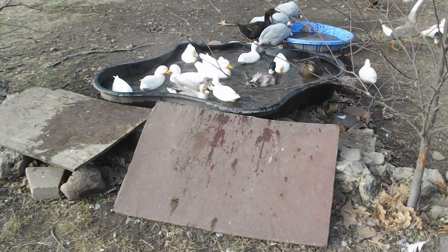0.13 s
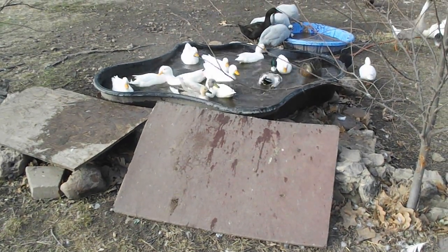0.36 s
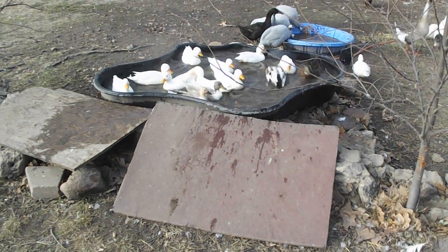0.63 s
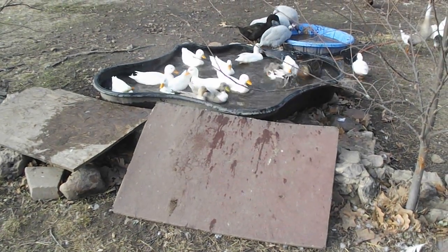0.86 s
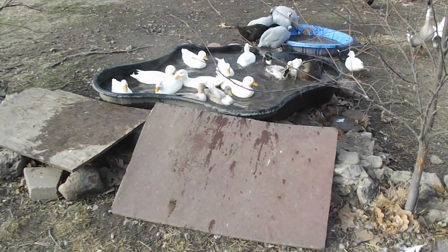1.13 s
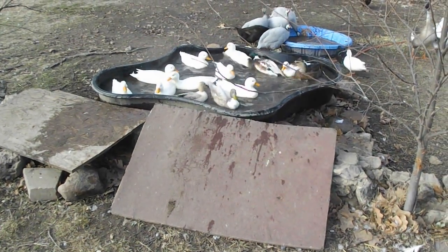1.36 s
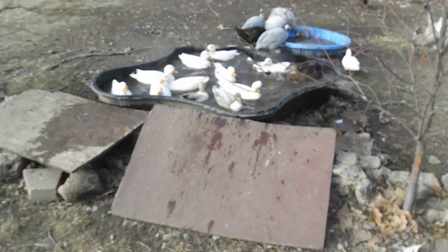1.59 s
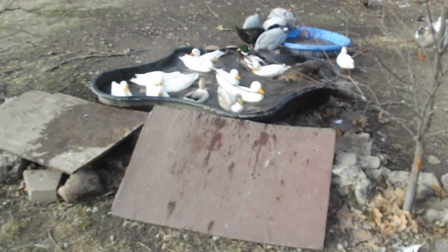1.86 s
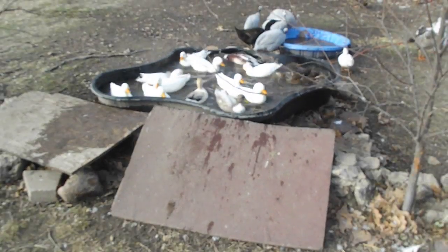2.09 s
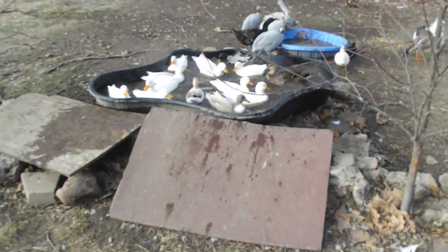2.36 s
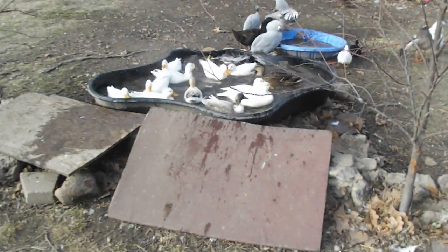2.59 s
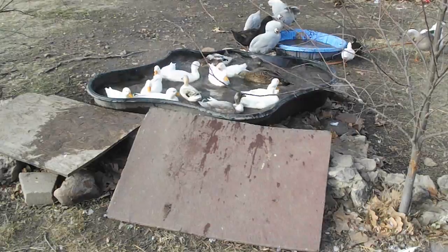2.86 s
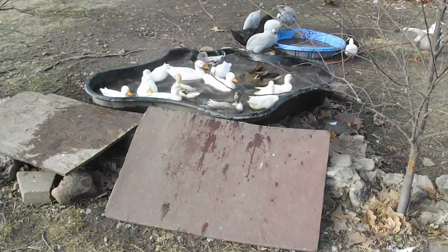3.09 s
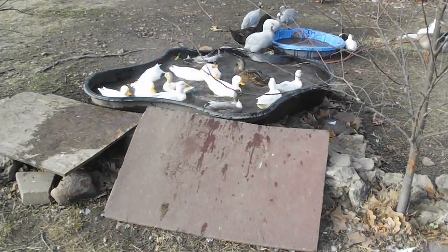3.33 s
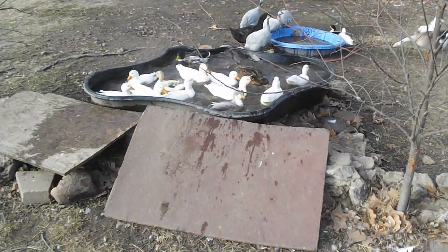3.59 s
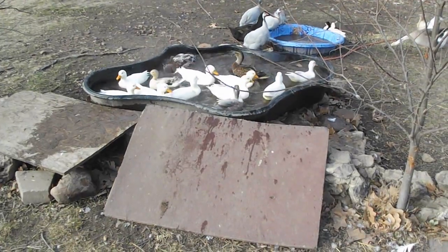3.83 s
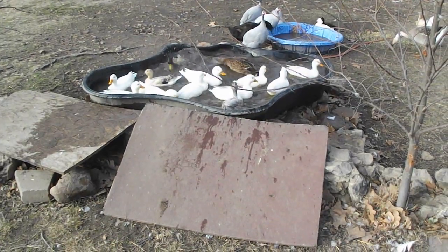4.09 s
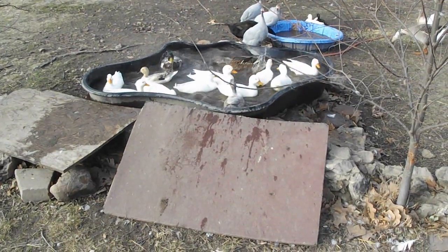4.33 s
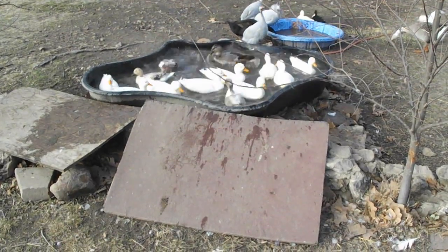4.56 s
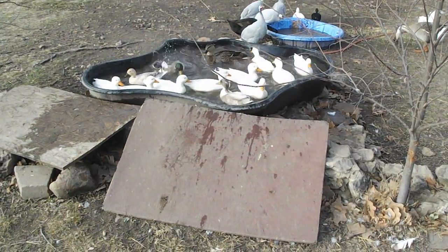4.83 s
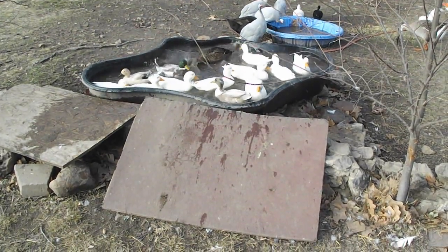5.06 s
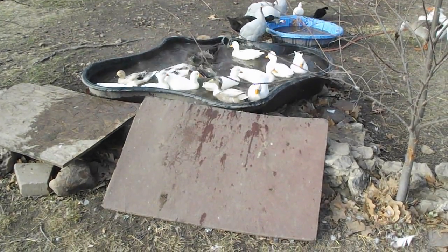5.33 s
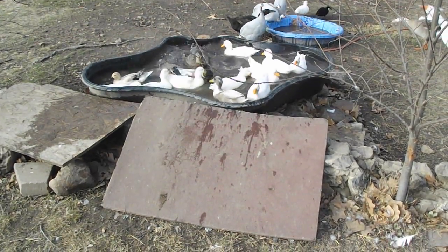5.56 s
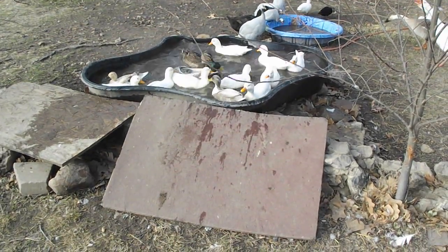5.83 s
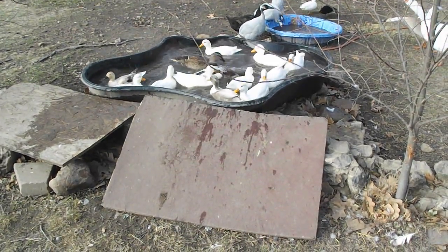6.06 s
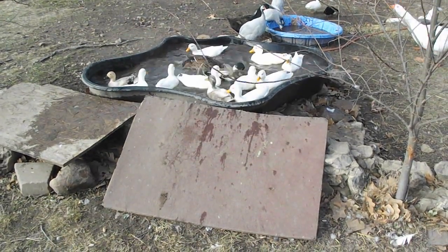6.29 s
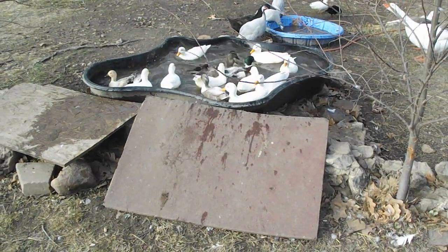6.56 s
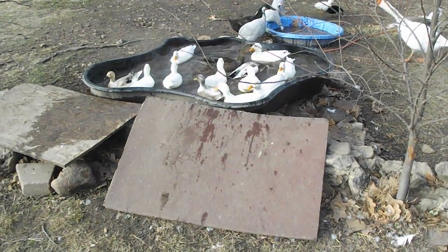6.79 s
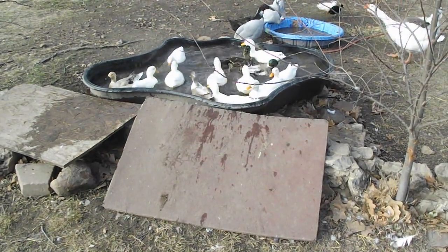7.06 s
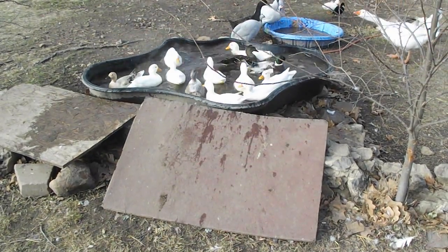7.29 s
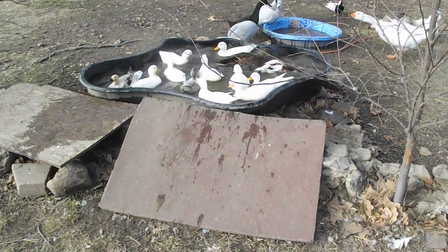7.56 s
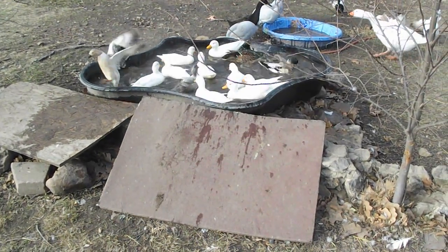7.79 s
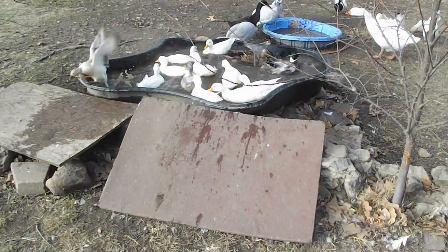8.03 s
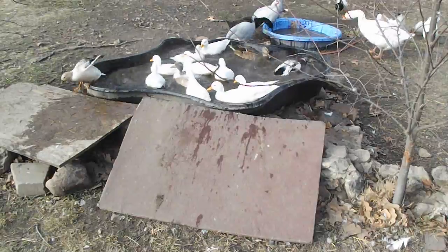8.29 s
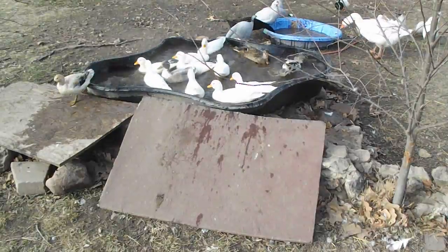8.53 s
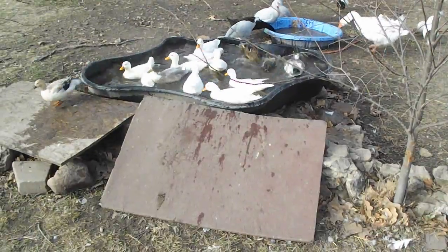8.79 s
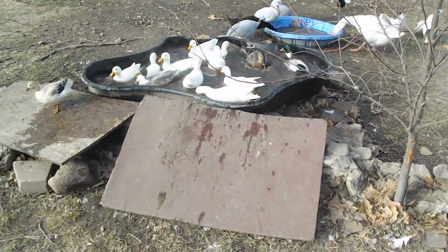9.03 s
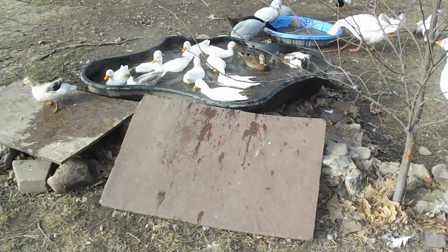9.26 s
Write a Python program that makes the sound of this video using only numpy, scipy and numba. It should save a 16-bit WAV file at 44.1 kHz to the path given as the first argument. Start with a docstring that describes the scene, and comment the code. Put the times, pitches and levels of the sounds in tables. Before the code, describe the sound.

A crowd of small ducks quacks, chuckles and croaks over each other at a backyard pond, with wind rumbling and buffeting the microphone near the end.

```python
"""A backyard pond crowded with small ducks: long quacks, throbbing chuckles, low rasps, far mutters, honks,
croaks and squeaks overlap. Pulses and breath noise ring throat resonances to make the voices; squeaks are whistles.
The hush of the yard is filtered noise with chirped drips; splashes are decaying noise bursts.
Wind buffets the small microphone as rumble, roar and damped swings; a stepped gain control cuts loud peaks."""
import sys
import numpy as np
from scipy import signal
from scipy.fft import rfft, irfft, next_fast_len
from scipy.io import wavfile
from scipy.ndimage import uniform_filter1d
from numba import njit

SR = 44100
rng = np.random.default_rng(int(sys.argv[2]) if len(sys.argv) > 2 else 0)


def wav_out(sig):
    """Save sig, one row per channel (or a flat mono array), as 16-bit PCM at SR to the path in sys.argv[1]."""
    wavfile.write(sys.argv[1], SR, np.round(np.clip(np.atleast_2d(sig).T, -1, 1) * 32767).astype(np.int16))


def how_loud(loudness_db):
    """Turn decibels into a plain amplitude multiplier (0 dB gives 1, 20 dB gives 10)."""
    steps = np.asarray(loudness_db, float) / 20
    return 10 ** steps


N = 414540


def evened(x):
    """Normalization: scales a signal to rms 1."""
    return x / np.sqrt(np.mean(x ** 2) + 1e-20)


def read(points, hz):
    """Spectral interpolation: reads a spectrum table on a log-frequency axis."""
    f, value = np.transpose(points)
    return np.interp(np.log(hz + 1), np.log(f + 1), value)


def add(mix, s, sound):
    """Superposition: adds a sound to the mix at time s."""
    part = mix[max(round(s * SR), 0):][:len(sound)]
    part += sound[:len(part)]


def coloured(x, points):
    """Linear filtering: multiplies the spectrum of x by a table of gains."""
    size = next_fast_len(len(x))
    gain = how_loud(read(points, np.fft.rfftfreq(size, 1 / SR)))
    return irfft(rfft(x, size) * gain, size)[:len(x)]


def resonate(x, hz, width):
    """Heterodyne resonance: shifts the curve hz down to zero, smooths twice and shifts back, with gain 1."""
    turn = np.exp(2j * np.pi * np.cumsum(hz * np.ones(len(x))) / SR)
    r = np.exp(-np.pi * width / SR)
    return 2 * (turn * signal.lfilter([(1 - r) ** 2], np.poly([r, r]), x / turn)).real


def wander(size, seconds):
    """Random modulation: twice-smoothed noise of rms 1 that drifts over the given seconds."""
    span = int(seconds * SR)
    return evened(uniform_filter1d(uniform_filter1d(rng.standard_normal(size), span), span))


# relative spectrum of the yard's hush: (frequency [Hz], level [dB])
YARD_COLOUR = [(100, 4.5), (300, -5.5), (700, -6.5), (1500, -10.5), (3000, -4.5), (8000, -8), (16000, -9.5)]


def yard():
    """Random noise in drifting time-frequency patches: a watery hush, with drips as rising damped chirps."""
    hz = np.fft.rfftfreq(512, 1 / SR)
    real, imaginary, patches = rng.standard_normal((N // 128 + 5, 257, 3)).T
    patches = evened(uniform_filter1d(uniform_filter1d(patches, 6, 0), 14, 1))
    spectrum = (real + 1j * imaginary) * how_loud(read(YARD_COLOUR, hz)[:, None] + 1.3 * patches)
    hush = evened(signal.istft(spectrum, nperseg=512, noverlap=384)[1][:N])
    # about 120 drips per second, most of them faint
    drops = (rng.random(N) < 120 / SR) * how_loud(3.5 * np.minimum(rng.exponential(1, N), 4))
    kind, u, drips = rng.integers(0, 12, N), np.arange(600) / SR, np.zeros(N)
    for k, f in enumerate(np.geomspace(900, 3600, 12)):
        chirp = np.sin(2 * np.pi * f * u * (1 + 8 * u))
        drip = chirp * np.exp(-u * f / 4) * np.minimum(u / 0.00022, 1)
        drips += signal.oaconvolve(drops * (kind == k), drip)[:N]
    return how_loud(-32.5) * (hush + how_loud(-19.0) * evened(drips))


# level of the wind's rumble at the microphone: (time [s], level [dB])
WIND_LEVEL = [(0.0, -23), (1.69, -31.5), (2.129, -20.5), (2.34, -39.5), (2.712, -24.5), (3.982, -42),
              (4.07, -30), (5.48, -41.5), (6.059, -24), (6.12, -43), (6.59, -25), (6.76, -45),
              (6.92, -30.5), (7.17, -22.5), (7.25, -12.5), (7.364, -5), (7.451, -6.5), (7.66, -13),
              (7.72, -13.5), (8.07, -17.5), (8.191, -34), (8.24, -8), (8.33, -15.5), (8.411, -11.5),
              (8.5, -22), (8.83, -32.5), (8.892, -13.5), (8.961, -28), (9.19, -21.5), (9.38, -10.5)]
# single buffets: (time of the crest [s], level of the swing [dB], frequency of the swing [Hz])
BUFFETS = [(7.28, -5, 104), (7.296, -4, 137), (7.34, -2, 221), (7.349, 7, 263), (7.365, 22, 251),
           (7.373, -6, 302), (7.38, 5, 203), (7.496, 5, 238), (7.422, 13.5, 120.6), (7.549, 6.5, 129),
           (7.752, -4.5, 135), (7.813, -1, 153), (8.049, -5, 218), (8.236, -2, 134), (8.279, 0.5, 150),
           (8.349, -8.5, 200), (8.382, -5, 114), (8.416, -6.5, 192), (8.47, -2.5, 198), (8.897, -15, 78.4),
           (9.062, -22, 78.5), (9.232, -5, 86.5), (9.259, -4, 113), (9.316, -2.5, 135), (9.349, 2.5, 113),
           (9.376, 2.5, 81)]
# relative spectrum of the rumble: (frequency [Hz], level [dB])
RUMBLE_COLOUR = [(15, -3), (40, 1.5), (100, -7), (170, -13), (300, -23), (500, -48)]
# relative spectrum of the roar: (frequency [Hz], level [dB])
ROAR_COLOUR = [(60, -17), (150, -1), (300, -5), (600, -14), (1200, -29), (2500, -40)]


def buffet(hz, t):
    """Damped oscillation: a few swings of the membrane, a sharp tip, and a puff of roar stirred up around it."""
    swing = np.cos(2 * np.pi * hz * t) * np.exp(np.minimum(t * hz / .5, -t * hz / .9))
    snap = how_loud(-11) * np.exp(-(t / 0.00033) ** 2)
    puff = evened(coloured(rng.standard_normal(len(t)), ROAR_COLOUR))
    # the puff decays by 60 dB in 57 ms and builds up four times as fast
    return swing + snap + how_loud(-8.5 - 60 * np.maximum(t, -4 * t) / 0.057) * puff


def wind():
    """Turbulent pressure on the membrane: lumpy rumble, a roar that grows faster than it, and single buffets."""
    level_db = np.interp(np.arange(N) / SR, *np.transpose(WIND_LEVEL))
    rumble = evened(coloured(rng.standard_normal(N), RUMBLE_COLOUR) * how_loud(2.8 * wander(N, 0.015)))
    roar = evened(coloured(rng.standard_normal(N), ROAR_COLOUR) * how_loud(4.5 * wander(N, .01)))
    out = how_loud(level_db) * (rumble + how_loud(1.83 * (level_db + 8.5)) * roar)
    t = np.arange(-600, 2400) / SR
    for s, swing_db, hz in BUFFETS:
        add(out, s + t[0], how_loud(swing_db) * buffet(hz, t))
    return out


# splashes: (time [s], level that scales the burst [dB])
SPLASHES = [(3.986, -32), (7.8034, -16), (7.8517, -1), (8.002, -11.5), (8.025, -5), (8.038, -18),
            (8.599, -20.5), (8.7025, -16.5), (8.7548, -16.5)]


def splashes():
    """Impact noise with exponential decay: wings and feet slap the water in short bright bursts."""
    out, t = np.zeros(N), np.arange(3000) / SR
    for s, level_db in SPLASHES:
        hiss = np.diff(rng.standard_normal(len(t) + 1))
        burst = resonate(rng.standard_normal(len(t)), 2800, 1000) + 0.5 * hiss
        # 60 dB of decay in 65 ms
        add(out, s, how_loud(level_db - 60 * t / 0.065) * np.minimum(t / 0.00039, 1) * burst)
    return out


def voice(hz, rough, bright_db, throat, stretch, middle_db=None, opening=None):
    """Source-filter principle: syrinx pulses and puffs of breath ring the throat in low, middle and upper bands."""
    turns = np.cumsum(hz * (1 + 0.022 * rough * wander(len(hz), 0.0034))) / SR
    k = np.arange(1, 70)[:, None]
    # the pulses are slightly smeared in time: upper harmonics lag the lower ones
    pulses = (np.cos(2 * np.pi * k * turns - .04 * k ** 2) * (k * hz < 11000)).sum(0)
    puffs = (4.5 + np.exp(-(turns % 1) / .5)) * rng.standard_normal(len(hz))
    drive = np.sqrt(1 - rough) * evened(pulses) + np.sqrt(rough) * evened(puffs)

    def ring(f, width, db):
        """Resonance with flutter: each one swells and fades a little on its own."""
        factor = stretch if f < 2300 or opening is None else opening if f < 3500 else 1
        return how_loud(db + 1.6 * wander(len(hz), .018)) * resonate(drive, f * factor, width)

    rings = [(row[0], ring(*row)) for row in throat]
    bands = (0, 1250), (1250, 2300), (2300, 9000)  # Hz, by the resting resonance
    low, middle, high = (sum(x for f, x in rings if a <= f < b) for a, b in bands)
    if middle_db is not None:
        remainder = np.sqrt(1 - np.clip(how_loud(bright_db), 0, .97) ** 2)
        part = np.clip(how_loud(middle_db) / remainder, 0, .95)
        low, middle = np.sqrt(1 - part ** 2) * evened(low), part * evened(middle)
    share = np.clip(how_loud(bright_db), .05, .97)
    edge = how_loud(-14) * evened(resonate(drive, 8000, 4100))  # the sharp edge of each pulse
    return np.sqrt(1 - share ** 2) * evened(low - middle) + share * (evened(high) + edge), turns


def call(s, t, effort_db, hz, bright_db, throat, clear, follow=0, chest_db=-22, middle_db=None, opening=1,
         hoarse_s=0.056):
    """Phonation onset: a call starts hoarse, clears, and turns hoarse again wherever the effort sags."""
    rough = clear + .6 * np.exp(-(t / hoarse_s) ** 2) + (effort_db.max() - effort_db) / 80
    stretch = (hz / 163) ** follow  # lower resonances follow the pitch
    sound, turns = voice(hz, np.clip(rough, 0, 1), bright_db, throat, stretch, middle_db, opening)
    sound = sound + how_loud(chest_db) * np.sin(2 * np.pi * turns)  # the chest radiates a weak fundamental
    return s, how_loud(effort_db) * sound * signal.windows.tukey(len(t), min(0.005 * SR / len(t), 1))


def rasp(s, level_db, length, hz, throat, rough, bright_db=-9):
    """Pulse-train excitation: a short run of slow pulses that sags in rate as it ends."""
    u = np.linspace(0, 1, int(length * SR))
    # every resonance is lowered by 7 %
    sound = voice(hz * (1 - 0.0948 * u ** 2), rough + 0 * u, bright_db, throat, 0.93)[0]
    return s, how_loud(level_db - 0.39 * u) * sound * signal.windows.tukey(len(u), .4)


# resting resonances of throat and open bill, for mutters and quacks: (frequency [Hz], width [Hz], level [dB])
OPEN_THROAT = [(691, 270, -10), (948, 232, 4), (1560, 140, 2.5), (2050, 510, 2), (2950, 224, -2.5),
               (3667, 225, -5), (4140, 810, -17.5)]


def mutters(mix):
    """Random arrivals: soft short rasps of birds further off, about five a second."""
    for at, size, hz, length in rng.random((5 * N // SR, 4)):
        seconds = np.interp(length, (0, 1), (.03, .08))
        pulse_hz = np.interp(hz, (0, 1), (110, 190))
        add(mix, *rasp(at * N / SR, -39 + 6 * size, seconds, pulse_hz, OPEN_THROAT, .4, -12))


# low nasal rasps, mostly drakes: (time [s], starting level [dB], length [s], starting pulse rate [Hz])
DRAKES = [(0.875, -32.5, 0.06, 89.8), (2.091, -26, 0.059, 118), (3.144, -30.5, 0.089, 123.6),
          (3.849, -25, 0.058, 141.3), (3.997, -29.5, 0.087, 116.8), (4.526, -23, 0.056, 117.7),
          (4.693, -26, 0.0856, 117.1), (4.892, -31.5, 0.048, 125), (5.06, -28.5, 0.087, 115.4),
          (5.566, -31.5, 0.097, 117.2), (6.19, -28.5, .1, 117.7), (6.888, -26, 0.088, 120.6),
          (7.082, -30, 0.051, 119), (4.237, -21.5, .08, 180.5), (0.553, -37, 0.071, 111)]
# resonances before the rasp lowers them: (frequency [Hz], width [Hz], level [dB])
DRAKE_THROAT = [(772, 200, 10), (1476, 480, 4), (2166, 57, 4), (2960, 1200, -9)]


def drakes(mix):
    """Nasal resonance: slow pulses ring strong low formants."""
    for row in DRAKES:
        add(mix, *rasp(*row, DRAKE_THROAT, .3))


# hoarse squawks: (time [s], starting level [dB], length [s], starting pulse rate [Hz])
SQUAWKS = [(8.15, -24, 0.056, 340), (8.995, -25, 0.0994, 210), (7.99, -34, 0.047, 49)]
# resonances before the rasp lowers them: (frequency [Hz], width [Hz], level [dB])
SQUAWK_THROAT = [(1120, 970, -12), (1670, 210, 17.5), (2050, 300, 15), (3200, 1100, -3)]


def squawks(mix):
    """Mixed excitation: more breath than pulses rings strong middle formants."""
    for row in SQUAWKS:
        add(mix, *rasp(*row, SQUAWK_THROAT, .6))


# harsh bright croaks: (time [s], starting level [dB], length [s], starting pulse rate [Hz])
CROAKS = [(0.142, -14.5, 0.03, 149.4), (0.999, -26.5, 0.065, 109.8), (2.262, -20, 0.062, 248.7),
          (2.388, -6.5, 0.029, 205), (2.868, -14, 0.038, 138.2), (2.981, -11.5, 0.027, 170.9),
          (4.292, -19, 0.047, 168), (5.83, -15.5, 0.059, 196.6), (5.99, -19, 0.085, 206),
          (6.066, -11, 0.043, 203.5), (6.407, -15.5, 0.022, 171.3), (6.636, -22.5, 0.032, 164)]
# resonances before the rasp lowers them: (frequency [Hz], width [Hz], level [dB])
CROAK_THROAT = [(970, 240, 3), (2063, 1400, -3), (2810, 480, 0), (3460, 1160, 1.5)]


def croaks(mix):
    """Mixed excitation: breathy pulses put most of their power into the upper formants."""
    for row in CROAKS:
        add(mix, *rasp(*row, CROAK_THROAT, .65, bright_db=-1.5))


# thin squeaks: (time [s], length [s], level [dB], starting frequency [Hz], final frequency [Hz])
SQUEAKS = [(0.217, 0.052, -35, 1258, 1416), (0.498, 0.051, -35, 1340, 1440),
           (0.524, 0.039, -33.5, 1695, 1854), (0.78, 0.027, -37.5, 1800, 1380),
           (1.408, .05, -26.5, 2020, 1385), (4.672, 0.095, -19.5, 1300, 1412),
           (4.743, .045, -26.5, 1840, 1954), (4.781, 0.029, -25.5, 1580, 1790),
           (6.665, 0.049, -26, 1860, 1270), (6.693, 0.026, -26.5, 1745, 1900),
           (7.671, 0.055, -35.5, 1950, 1600), (8.028, 0.028, -35, 1313, 1330),
           (8.125, 0.04, -24.5, 1356, 1400), (8.385, 0.031, -32, 1204, 1110),
           (8.424, 0.026, -31.5, 816, 880), (8.84, 0.034, -27.5, 1380, 1260),
           (8.949, 0.071, -24, 1314, 1490), (9.047, 0.029, -25, 2050, 1676),
           (9.221, 0.037, -33, 3335, 3650), (9.24, 0.038, -32.5, 3490, 2750)]


def squeaks(mix):
    """Frequency modulation: gliding, slightly fluttering whistles with a weak octave."""
    for s, length, db, start_hz, end_hz in SQUEAKS:
        u = np.linspace(0, 1, int(length * SR))
        flutter = 1 + 0.04 * wander(len(u), 0.00049)
        turns = np.cumsum((start_hz + (end_hz - start_hz) * u) * flutter) / SR
        tone = np.sin(2 * np.pi * turns) + how_loud(-14.0) * np.sin(4 * np.pi * turns)
        add(mix, s, np.sqrt(2) * how_loud(db) * tone * signal.windows.tukey(len(u), .4))


# gliding honks: (time [s], length [s], effort [dB], starting pitch [Hz], final pitch [Hz])
HONKS = [(5.795, 0.055, -31, 863, 1030), (6.617, 0.036, -15.5, 985, 1130), (7.838, 0.034, -9, 468.5, 494),
         (7.965, 0.055, -23.5, 866, 914), (8.802, 0.0566, -28.5, 489, 448), (9.085, .1, -36.5, 382, 321)]
# resonances: (frequency [Hz], width [Hz], level [dB])
HONK_THROAT = [(497, 250, -13), (1020, 470, -5), (1950, 680, 5.5), (2950, 680, -4.5), (3400, 510, -10.5)]


def honks(mix):
    """Formant excitation by a gliding pitch: effort sags at both ends, and higher honks hold less upper power."""
    rise_s, fall_s = 0.012, 0.037
    for s, length, effort_db, start_hz, end_hz in HONKS:
        t = np.arange(0, length, 1 / SR)
        ends = np.maximum(1 - t / rise_s, 0) + np.maximum(1 - (length - t) / fall_s, 0)
        hz = start_hz + (end_hz - start_hz) * t / length
        bright_db = -0.5 - 6 * np.log2(hz / 300)
        add(mix, *call(s, t, effort_db - 9.5 * ends, hz, bright_db, HONK_THROAT, .02,
                       chest_db=-40, hoarse_s=.018))


# one loud goose honk that climbs: (time [s], effort [dB], pitch [Hz])
GOOSE = [(2.275, -27, 495.6), (2.3, -7, 522), (2.335, -14.5, 547), (2.388, -7.5, 577), (2.4, -26, 596)]
# resonances of the goose: (frequency [Hz], width [Hz], level [dB])
GOOSE_THROAT = [(584, 180, 4.5), (1000, 210, 7), (1730, 1000, -3), (2380, 430, -8), (3130, 980, 9.5),
                (3880, 730, 10)]
# thin bright cries that fall, one curve each: (time [s], effort [dB], pitch [Hz])
CRIES = [
    [(4.205, -31, 284.5), (4.222, -20.5, 280), (4.26, -23, 268), (4.3, -36, 259)],
    [(4.555, -28, 317), (4.6, -24, 315), (4.632, -23, 309), (4.652, -23.5, 294), (4.675, -35, 273)],
]
# resonances of the cries: (frequency [Hz], width [Hz], level [dB])
CRY_THROAT = [(1240, 1200, 2), (1900, 310, -5), (2620, 240, -4), (2950, 310, -2), (3410, 340, -2),
              (3740, 360, -7)]


def cry(rows, throat, bright_db):
    """Fixed formants: the harmonics of a clear high voice slide through a still throat."""
    s, effort_db, hz = np.transpose(rows)
    t = np.arange(s[0], s[-1], 1 / SR)
    return call(s[0], t - s[0], np.interp(t, s, effort_db), np.interp(t, s, hz), bright_db, throat, .02,
                chest_db=-40, hoarse_s=.025)


def goose_and_cries(mix):
    """Fixed formants for two kinds of voice: a climbing goose honk and brighter falling cries."""
    add(mix, *cry(GOOSE, GOOSE_THROAT, -4.0))
    for rows in CRIES:
        add(mix, *cry(rows, CRY_THROAT, -0.62))


# throbs through a nearly shut bill:
# (time of the crest [s], fall [s], effort [dB], crest pitch [Hz], bill opening [ratio of resting resonances])
CHUCKLES = [(1.378, 0.059, -19.5, 160.5, 0.97), (1.485, .07, -22.5, 158.4, .96),
            (1.821, 0.067, -22, 160.1, 1.03), (1.911, 0.086, -19, 164.5, 1.03),
            (2.014, 0.0827, -16.5, 167, 1.014), (2.716, 0.037, -16, 165.2, 1.01),
            (2.812, .06, -14, 165.2, 1), (3.41, 0.056, -13.5, 168.8, 1.02),
            (3.492, 0.025, -13.5, 165.8, 1.014), (3.531, 0.032, -16.5, 169.7, 1.13),
            (3.582, 0.057, -17.5, 163.7, 1.02), (3.621, 0.072, -22, 166, 0.957),
            (3.697, 0.11, -20.5, 170.6, 1.03), (3.74, 0.081, -21.5, 172, 1.146),
            (5.112, 0.034, -25.5, 168, 1.054), (5.161, 0.077, -14, 167, 1.005),
            (5.232, 0.017, -11, 160, 0.97), (5.277, .08, -15.5, 173.1, 1.057),
            (5.375, 0.085, -11.5, 175.9, 1.043), (5.462, 0.038, -17, 170.6, 1.046),
            (5.497, 0.053, -14.5, 171.6, 1.09), (7.165, 0.062, -14.5, 179, 1.14),
            (7.227, 0.067, -17.5, 175.5, 1.107)]
# resting resonances: (frequency [Hz], width [Hz], level [dB])
SHUT_THROAT = [(958, 213, -2.5), (2028, 274, -3.5), (2913, 228, 5), (3526, 360, -7)]


def chuckle(s, fall, effort_db, hz, opening):
    """Joint modulation: pitch, throat, brightness and effort arch up to a crest and sag again."""
    rise = .04  # s
    t = np.arange(-rise, fall, 1 / SR)
    sag = (t / np.where(t < 0, rise, fall)) ** 2
    arch = 1 - .075 * sag
    bright_db = -4 + 6.5 * (opening - 1)  # the upper share grows as the bill opens
    # each throb differs a little in hoarseness
    rough = np.clip(.08 + .05 * rng.uniform(-1, 1) + .2 * sag, 0, 1)
    sound, turns = voice(hz * arch, rough, bright_db - 9 * sag, SHUT_THROAT, opening * arch,
                         bright_db - 5 - 7 * sag, opening * arch)
    sound = sound + how_loud(-19) * np.sin(2 * np.pi * turns)  # weak fundamental
    return s + t[0], how_loud(effort_db - 6 * sag) * sound * signal.windows.tukey(len(t), .4)


def chuckles(mix):
    """Superposition of throbs: close successions of them chuckle."""
    for row in CHUCKLES:
        add(mix, *chuckle(*row))


# long open-billed quacks, one curve each:
# (time [s], effort [dB], pitch [Hz], ring of the bill [Hz], share of the middle resonances [dB])
QUACKS = [
    [(0.0, -24.5, 139.6, 3110, -9), (.06, -22, 147.5, 2820, -7), (.15, -18, 152.3, 2990, -11),
     (.185, -42, 154.5, 3050, -11)],
    [(.99, -33, 145.8, 2750, -20), (1.036, -22, 144, 2660, -11.5), (1.18, -19, 154.8, 2960, -10.5),
     (1.25, -17.5, 156.9, 2990, -9.5), (1.29, -30.5, 147, 3050, -2.5)],
    [(1.54, -26, 142.4, 2680, -9), (1.6, -16.5, 151, 2910, -13), (1.68, -10, 154, 3080, -4.5),
     (1.706, -20, 150.3, 2980, -6)],
    [(2.86, -21.5, 159.1, 3150, -3), (2.91, -16, 165.6, 3456, -2), (2.97, -13, 166.4, 3080, -0.5),
     (3.015, -26, 161, 3070, -1.5)],
    [(4.24, -36, 180.2, 3000, -8), (4.295, -25, 179.6, 2780, -2), (4.315, -16.5, 183.7, 2950, -6),
     (4.4, -9.5, 186.6, 2726, -12.5), (4.49, -13, 186.7, 2870, -10.5), (4.54, -20.5, 168.5, 2860, -7)],
    [(5.835, -38, 182.5, 2800, -7), (5.855, -13.5, 182.5, 2730, -8), (5.96, -15.5, 177.9, 2570, -10),
     (6.08, -15.5, 180, 2880, -5), (6.15, -16.5, 176.7, 3020, -8), (6.19, -22.5, 166, 2900, -9)],
    [(6.312, -39, 187.8, 3050, -2), (6.328, -14.5, 189, 2950, -5), (6.37, -22, 184.7, 3050, -13.5),
     (6.415, -22, 184.8, 3100, -4), (6.445, -52, 172, 3170, -7)],
]


def quack(rows):
    """Moving formants: effort sets the brightness; the bill moves its ring and feeds the middle resonances."""
    s, *columns = np.transpose(rows)
    t = np.arange(s[0], s[-1], 1 / SR)
    effort_db, hz, ring_hz, middle_db = (np.interp(t, s, c) for c in columns)
    bright_db = -3 + 0.23 * (effort_db - effort_db.max())
    opening = ring_hz / 2950  # relative to the resting ring in Hz
    return call(s[0], t - s[0], effort_db, hz, bright_db, OPEN_THROAT, .1, .8, -22, middle_db, opening)


def quacks(mix):
    """Superposition of the long quacks, each on its own curve."""
    for rows in QUACKS:
        add(mix, *quack(rows))


def flock():
    """Early reflections: all voices, with a short scatter of echoes off fence, ground and water."""
    voices = np.zeros(N)
    for source in (mutters, drakes, squawks, croaks, squeaks, honks, goose_and_cries, chuckles, quacks):
        source(voices)
    t = np.arange(SR // 4) / SR
    sparse = rng.standard_normal(len(t)) * (rng.random(len(t)) < .05)
    echoes = sparse * (t > .006) * how_loud(-60 * t / .3)  # 60 dB of decay in 0.3 s
    return voices + how_loud(-13) * signal.oaconvolve(voices, echoes / np.linalg.norm(echoes))[:N]


def scene():
    """Superposition of yard, wind, splashes and flock on one channel."""
    return (yard() + wind() + splashes() + flock())[None]


@njit
def stepped_gain(x, limit, lag, least_cut, frame, rise):
    """Feedback gain control: cuts in one step shortly after a peak passes the limit, recovers a step each frame."""
    out, gain, wait, peak = np.empty(len(x)), 1., -1, 0.
    for i in range(len(x)):
        out[i] = gain * x[i]
        if wait < 0 and abs(out[i]) > limit:
            wait, peak = lag, 0.
        if wait >= 0:
            peak = max(peak, abs(out[i]))
            if wait == 0:
                gain *= least_cut * np.sqrt(limit / peak)
            wait -= 1
        if i % frame == 0:
            gain = min(gain * rise, 1.)
    return out


def low_pass(x):
    """Removes everything above the highest recorded frequency."""
    return signal.sosfilt(signal.butter(12, 16970, fs=SR, output="sos"), x)


# response of the microphone: (frequency [Hz], gain [dB])
MIC = [(20, 2.5), (2400, 3.5), (3300, 7.5), (4000, -2), (5000, -10.5), (6300, -18.5), (8200, -10),
       (11000, -20.5), (15500, -29.5)]


def record(dry):
    """Transduction: microphone response, stepped gain control and the converter's limit."""
    heard = coloured(dry[0], MIC)
    held = stepped_gain(heard, limit=.6, lag=36, least_cut=how_loud(-1.0), frame=round(.032 * SR), rise=how_loud(1.8))
    mix = np.clip(held, -1, 1)[None]
    return low_pass(mix)


dry = scene()
out = record(dry)
wav_out(out)
```